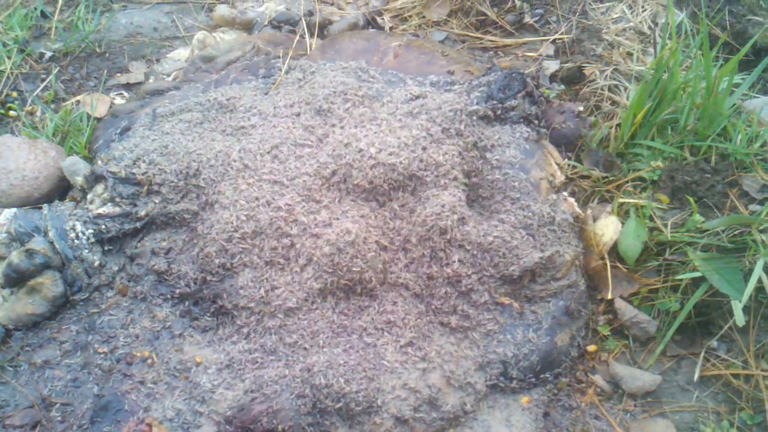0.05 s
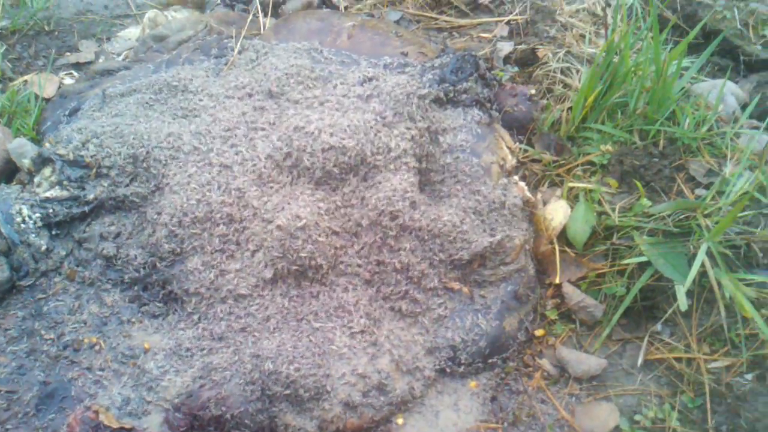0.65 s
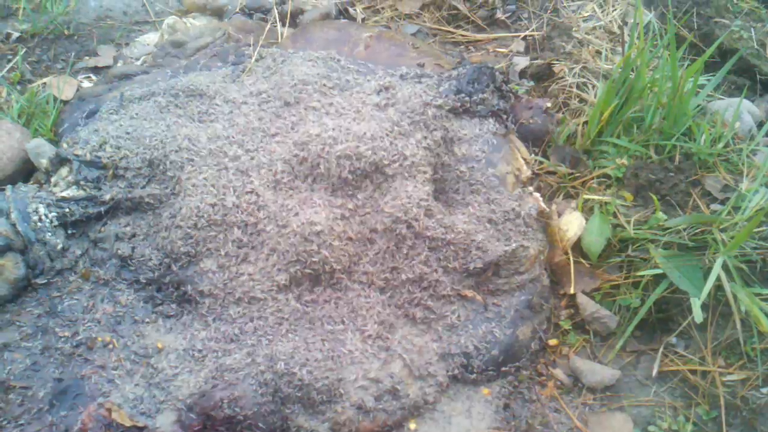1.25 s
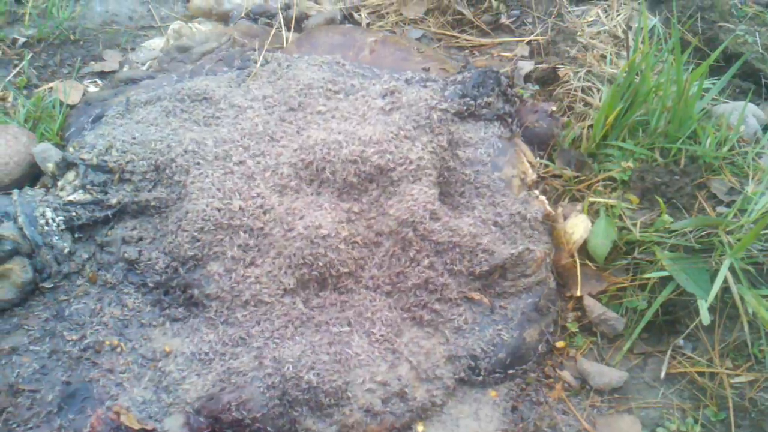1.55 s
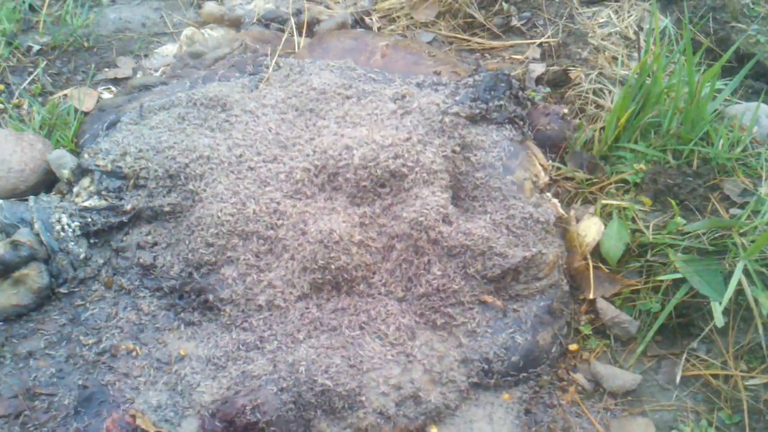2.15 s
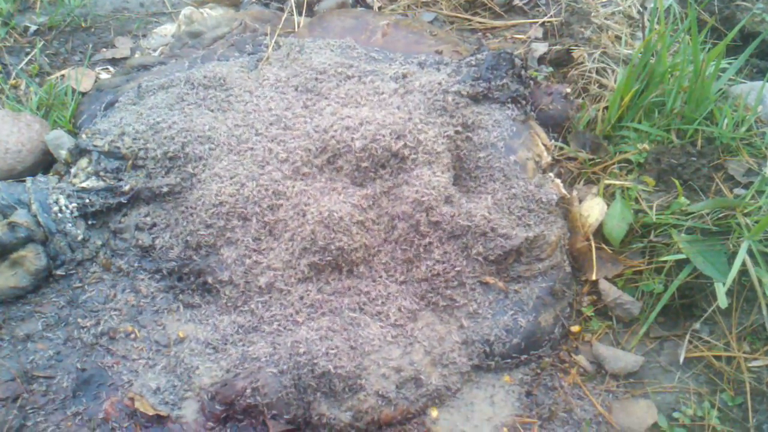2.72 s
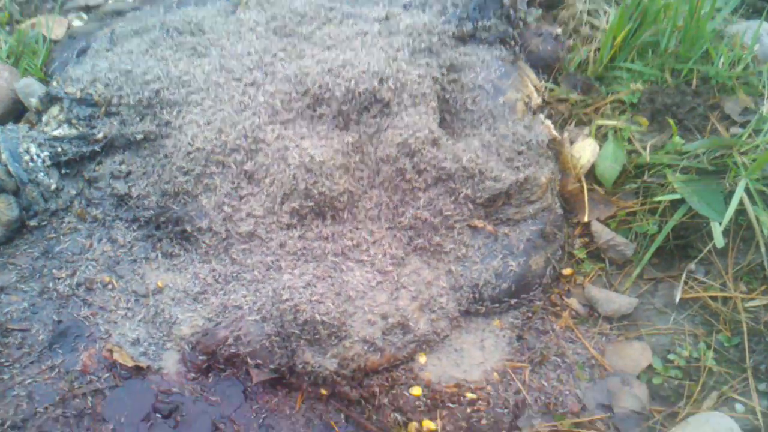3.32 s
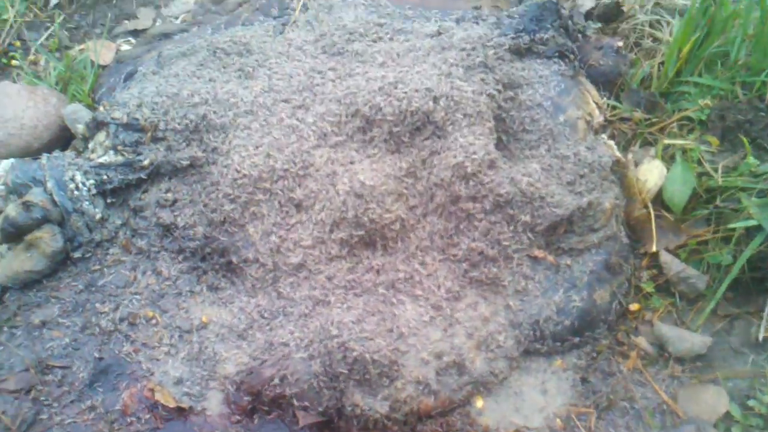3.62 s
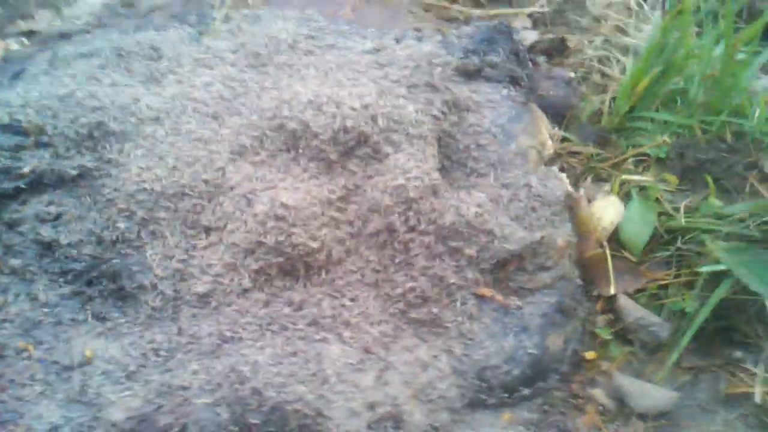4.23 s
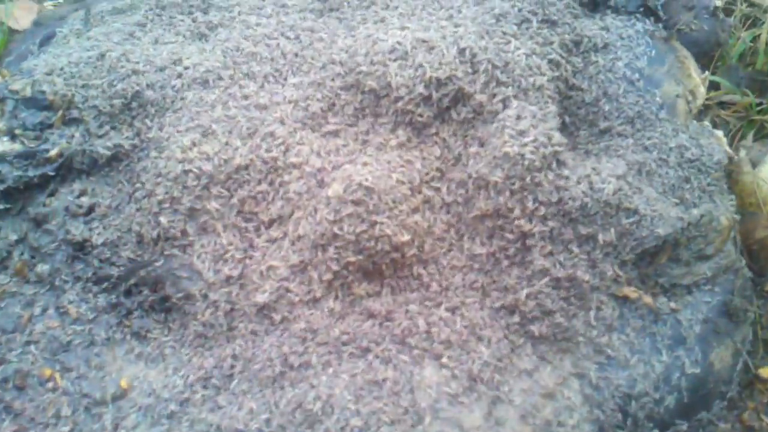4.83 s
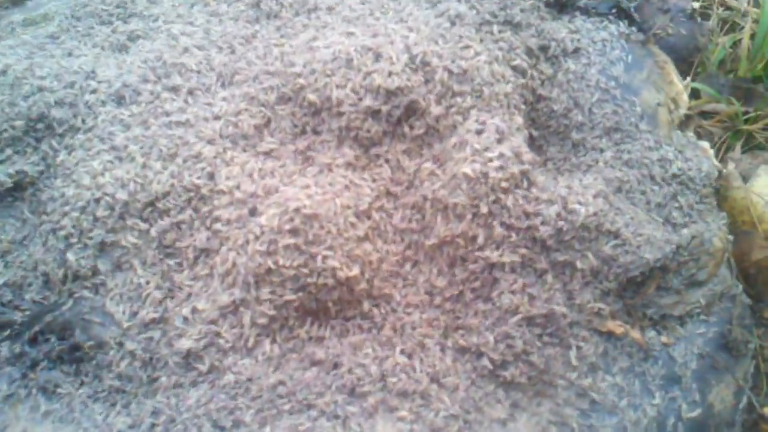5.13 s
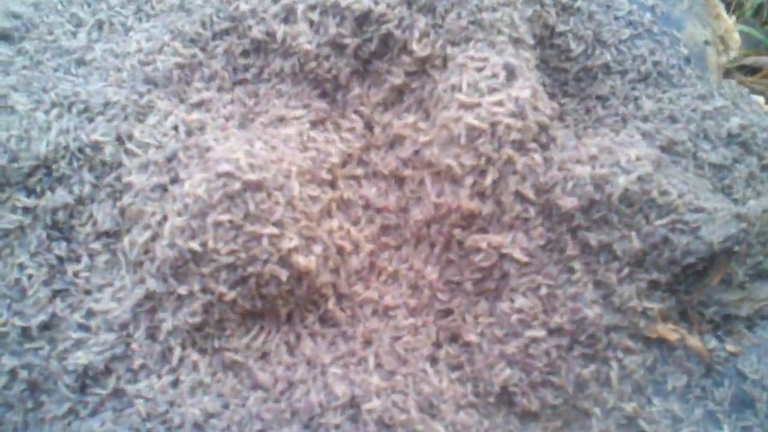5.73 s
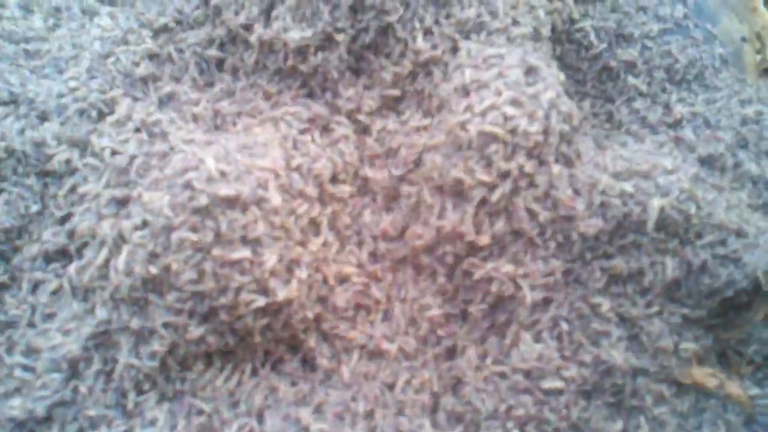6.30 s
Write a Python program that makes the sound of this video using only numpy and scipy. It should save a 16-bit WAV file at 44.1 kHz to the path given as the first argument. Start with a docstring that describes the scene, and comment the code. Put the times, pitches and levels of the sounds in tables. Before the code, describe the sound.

A handheld phone outdoors picks up the constant rumble and rattle of an idling engine at a distance, with hums and a thin whine. Tiny wet pops from a mass of maggots on the ground blend into a faint fizz. In the second half the microphone gets closer to them, bringing out a grainy crackle and several sharp little ticks as the engine's rattle becomes a bit more present.

```python
"""Maggots near an idling engine

Outdoors, a phone is held over a heap of maggots, whose tiny wet pops merge into a fizz. Some way off
an engine idles: its exhaust rumbles and its cylinders knock, in a pattern that repeats six times a
second, with hiss, hums and a whine. From about 3 s the phone is lowered: sound bouncing off the ground
fills in the middle pitches, a grainy crackle comes through and a few ticks stand out."""
import sys
import numpy as np
from scipy import signal
from scipy.fft import rfft, irfft
from scipy.io import wavfile

SR = 44100
rng = np.random.default_rng(int(sys.argv[2]) if len(sys.argv) > 2 else 0)


def put_to_file(sound):
    """Save the sound as 16-bit audio at rate SR, in the file named by the first command-line argument."""
    columns = np.atleast_2d(sound).T  # one column per channel
    safe = np.clip(columns, -1, 1)
    whole_steps = np.round(safe * 32767)
    wavfile.write(sys.argv[1], SR, whole_steps.astype(np.int16))


N = 284886
TIME, FREQS = np.arange(N) / SR, np.fft.rfftfreq(N, 1 / SR)
FIRING_HZ, TOP_HZ = 48.02, 13950  # engine firings per second; highest pitch the phone picks up

# How strong the rumble is from low to high: pitch_hz, gain_db
RUMBLE_SHAPE = [(20, -29), (55, -31.5), (80, -16.5), (115, -14), (155, -2.5), (220, -3.5), (310, -2),
                (420, -3), (590, -7), (700, -15.5), (1000, -21), (2000, -31), (5000, -38.5)]
# Slow rises and dips of the rumble: time_s, gain_db
RUMBLE_SWELLS = [(0, 0), (.65, 0.5), (.82, 0.5), (1.0, -0.5), (1.3, 1.5), (1.47, -2), (1.6, 0.5),
                 (1.92, 0.9), (2.07, -0.5), (2.6, -0.4), (2.9, -0.3), (3.15, 0), (3.35, -1.7), (3.56, 0.5),
                 (3.75, -0.1), (4.2, -1), (4.5, 0.4), (5.05, -0.5), (6.0, 0.5), (6.46, 0.7)]
# The noisy rumble's loudest band, which wanders by chance: time_s, pitch_hz, level_db
RUMBLE_PEAK_PATH = [(0, 346.3, -44.5), (.7, 343.7, -49), (.97, 355, -39), (1.2, 290, -44), (1.42, 335, -44),
                    (1.6, 350.4, -40), (1.95, 275, -39), (2.1, 320, -55), (2.35, 349.3, -40),
                    (3.152, 310, -42.5), (3.349, 363, -41.5), (3.571, 362, -34.5), (3.75, 340.8, -43),
                    (4.3, 346.4, -44), (4.54, 360, -38), (4.931, 338.4, -52), (5.3, 366.3, -41),
                    (5.5, 278.8, -40.5), (6.0, 274.4, -41), (6.46, 280, -41.5)]
# How hard each cylinder knocks, in firing order: dull_db, bright_db
CYLINDER_KNOCKS = [(-3.5, -5), (-7, -2.5), (-4.5, -4), (-5, 2), (-1.5, -2.5), (-0.5, -3.5), (-2, -5),
                   (-3, -3.5)]
# How strong the rattle is from low to high: pitch_hz, gain_db
RATTLE_SHAPE = [(300, -15), (700, 1), (1020, -1.5), (1600, 0), (2000, 1.5), (2480, -7.5), (2850, 0),
                (3200, -3), (4000, -9), (4800, -47), (9000, -40)]
# Where the engine's metal rings: pitch_hz, width_hz, boost_db
METAL_RINGS = [(1100, 26, 3), (1295, 40, 3.5), (1558, 58, 3.5), (1780, 47, 4), (1970, 41, 2),
               (2145, 41, 8.5), (2359, 245, 12)]
# How strong both engine hiss and maggot fizz are from low to high: pitch_hz, gain_db
FIZZ_SHAPE = [(500, -17), (2000, -15), (4400, 7), (4900, 1), (5800, 4.5), (6500, 3.5), (8000, 3.5),
              (9000, -1.5), (11000, -2), (13000, -9), (14000, -1.5)]
# Hums that follow the engine's speed: waves_per_cycle
ENGINE_HUM_MULTIPLES = [8, 16, 24, 32, 34, 44, 48, 88, 156, 166, 228, 256]
# How loud each of those hums is: level_db
ENGINE_HUM_LEVELS = [-70, -57, -56, -54.5, -52, -52.5, -61, -50.5, -61, -62, -65.5, -63]
# Looser hums of steady pitch, from the fan and belts and, higher up, from the engine: pitch_hz, level_db,
# width_hz
LOOSE_HUMS = [(133.86, -51.5, 0.61), (357.7, -46, 8.7), (404, -60, 1.7), (434.3, -50, 4.8),
              (534.7, -55.5, 2.6), (1135, -59.5, 2.8), (1427, -60, 2.6), (2140, -62, 4.7)]
# The whine's tones, from one step below its main pitch upwards: level_db, change_when_near_db
WHINE_TONES = [(-54, 3), (-51, -0.8), (-50.5, -3), (-54.5, -1.5)]
# What the bounce off the ground changes: pitch_hz, gain_when_near_db, extra_at_bottom_db
GROUND_BOUNCE = [(100, 2, -3.5), (206, 4, -2.5), (271, -1.5, 2.5), (310, -3, 2), (454, 1, -2.5),
                 (615, 5, -2), (690, 3, -2), (860, 0, 5), (1030, 5, 2.5), (1240, 8, -2.5), (1480, 8.5, -.5),
                 (1530, 4, -3), (1690, 2.5, 3.5), (1810, -4.5, 3), (1900, -0.5, 1.5), (2140, 1, -0.5),
                 (2350, 3, -6), (2730, 4.5, -2.5), (4000, 1.5, 1), (5000, -0.5, 1), (9000, 4.5, -3),
                 (12000, 3, 0.5)]
# Stray ticks: start_s, level_db, pitch_hz, fade_s (to fall by 60 dB), stereo_difference_db
STRAY_TICKS = [(4.465, -20, 1460, 0.0098, 0), (4.592, -23, 1400, .012, 0), (4.9589, -14, 1640, 0.013, 2),
               (4.961, -20.5, 960, 0.011, -3), (5.2264, -18, 2794, 0.0052, -3), (5.26, -29, 1400, .012, 0),
               (5.56, -27, 2900, .007, -1), (5.6488, -23, 1650, 0.011, 0), (5.7163, -22, 1700, 0.008, -2),
               (6.431, -27, 1566, 0.011, 0)]
# The phone's two microphones: pitch_hz, stereo_difference_db, lean_left (-1 to 1), crossfeed (0 to 1)
MICROPHONES = [(25, 8, -.2, 0.1), (68.7, 2, -0.32, 0.01), (136, -7.5, -0.0028, 0), (452, -10, 0.52, 0.02),
               (834, -10, 0.68, 0.43), (1210, -4.5, -0.13, 0.72), (1900, 3.5, -0.99, 0.94),
               (3850, -1.5, -0.7, 0.86), (4160, 0, -0.11, 0.38), (14000, 0, -0.016, 0.17)]


def gain_of(db):
    """Turns decibels into a number to multiply by."""
    return 10 ** (np.asarray(db) / 20)


def unit_level(x):
    """Scales a sound so that its average power is 1."""
    return x / np.sqrt(np.mean(np.abs(x) ** 2) + 1e-20)


def curve(points, column=1):
    """Joins a table's points into one value for every frequency."""
    table = np.array(points, float)
    return np.interp(np.log(FREQS + 1), np.log(table[:, 0] + 1), table[:, column])


def filtered(x, db):
    """Turns each frequency up or down by its own number of decibels."""
    return irfft(rfft(x) * gain_of(db), N)


def drift(rate_hz):
    """Two slow random wobbles, as complex numbers that hold both size and phase."""
    spectrum = rng.standard_normal((2, N)) + 1j * rng.standard_normal((2, N))
    keep_slow = np.exp(-(np.fft.fftfreq(N, 1 / SR) / rate_hz) ** 2)
    return unit_level(np.fft.ifft(spectrum * keep_slow))


def tone(turns, waver, waver_hz):
    """A pure tone plus a drifting copy that makes it waver; turns counts the waves gone by."""
    start_phase = np.exp(2j * np.pi * rng.random((2, 1)))
    wobble = start_phase + waver * drift(waver_hz)
    return unit_level((wobble * np.exp(2j * np.pi * turns)).real)


def cycle_noise(cycles, repeat_share, size=SR // 6):
    """Noise that is partly new and partly the same in every engine cycle."""
    patterns = rng.standard_normal((2, size))
    repeating = np.array([np.interp(cycles % 1, np.arange(size) / size, row) for row in patterns])
    return np.sqrt(repeat_share) * repeating + np.sqrt(1 - repeat_share) * rng.standard_normal((2, N))


def rumble(cycles, level_db=-34):
    """Noise from the exhaust and engine block, dulled by distance; its loudest band wanders."""
    times, hz, db = np.transpose(RUMBLE_PEAK_PATH)
    turns = np.cumsum(np.interp(TIME, times, hz)) / SR
    peak_band = gain_of(np.interp(TIME, times, db)) * tone(turns, waver=1.53, waver_hz=22)
    swell = gain_of(np.interp(TIME, *np.transpose(RUMBLE_SWELLS)))
    noise = filtered(cycle_noise(cycles, repeat_share=0.28), curve(RUMBLE_SHAPE))
    return peak_band + swell * gain_of(level_db) * unit_level(noise)


def knock_loudness(cycles, cylinder_db, ring_s=0.0071, echo_db=-5, valve_lead=0.32, valve_db=-0.5):
    """Each cylinder gives a valve tap, then a knock; both die quickly and echoes fill the gaps."""
    firings = len(CYLINDER_KNOCKS) * cycles
    power = gain_of(echo_db) ** 2 / 2
    for count, db in ((firings, 0), (firings + valve_lead, valve_db)):
        strength = gain_of(db + cylinder_db[count.astype(int) % len(CYLINDER_KNOCKS)])
        age = (count % 1) / FIRING_HZ
        power = power + strength ** 2 * np.exp(-age / ring_s)
    return np.sqrt(power)


def rattle(cycles, dull_lead_cycles=0.02, split_hz=2350, level_db=-39):
    """Each knock rings the engine's metal with a dull burst and, just after it, a bright one."""
    dull_db, bright_db = np.transpose(CYLINDER_KNOCKS)
    dull = cycle_noise(cycles, repeat_share=0.35) * knock_loudness(cycles + dull_lead_cycles, dull_db)
    bright = cycle_noise(cycles, repeat_share=0.35) * knock_loudness(cycles, bright_db)
    above_split = (FREQS / split_hz) ** 16 + 1e-12
    lows = filtered(unit_level(dull), -10 * np.log10(1 + above_split))
    highs = filtered(unit_level(bright), -10 * np.log10(1 + 1 / above_split))
    metal_db = sum(db / (1 + (2 * (FREQS - hz) / width) ** 2) for hz, width, db in METAL_RINGS)
    return gain_of(level_db) * unit_level(filtered(lows + highs, curve(RATTLE_SHAPE) + metal_db))


def hiss(cycles, level_db=-55.5, throb_db=2.5, loudest_at=0.69):
    """The engine's airy hiss swells once in every cycle."""
    throb = gain_of(throb_db * np.cos(2 * np.pi * (cycles - loudest_at)))
    noise = filtered(cycle_noise(cycles, repeat_share=0.24), curve(FIZZ_SHAPE))
    return gain_of(level_db) * throb * unit_level(noise)


def hums(cycles):
    """Engine hums that waver on their way through the air, and looser hums of steady pitch from the fan, the
    belts and the engine."""
    engine = sum(gain_of(db) * tone(multiple * cycles, waver=0.45, waver_hz=0.54)
                 for multiple, db in zip(ENGINE_HUM_MULTIPLES, ENGINE_HUM_LEVELS))
    loose = sum(gain_of(db) * tone(hz * TIME, waver=0.37, waver_hz=2 * width)
              for hz, db, width in LOOSE_HUMS)
    return engine + loose


def whine(cycles, near, pitch_hz=773.2, sag_hz=7, sag_at_s=3.93, sag_half_s=0.17):
    """A whine, probably a belt, sags once; the firings chop it into tones one firing rate apart."""
    sag = sag_hz * np.exp(-((TIME - sag_at_s) / sag_half_s) ** 2)
    turns = np.cumsum(pitch_hz - sag) / SR
    firings = len(CYLINDER_KNOCKS) * cycles
    return sum(gain_of(db + near_db * near) * tone(turns + step * firings, waver=0.2, waver_hz=2.5)
               for step, (db, near_db) in enumerate(WHINE_TONES, start=-1))


def maggot_fizz(near, pops_per_s=5000, level_db=-50.5, near_db=2.5, flurry_db=3.0, bands=6):
    """Thousands of tiny wet pops merge into a fizz that grows as the phone comes closer."""
    sizes = gain_of(-0.5 * np.minimum(rng.exponential(1, (2, N)), 4))
    pops = sizes * rng.choice([-1, 1], (2, N)) * (rng.random((2, N)) < pops_per_s / SR)
    wash = 0.81 * rng.standard_normal((2, N))
    spectrum = rfft(unit_level(pops) + wash) * gain_of(curve(FIZZ_SHAPE))
    band = np.minimum(FREQS / TOP_HZ * bands, bands - 1).astype(int)
    # coarse and fine pops each come in their own flurries
    fizz = sum(gain_of(flurry_db * drift(rate_hz=28).real) * irfft(spectrum * (band == k), N)
               for k in range(bands))
    return gain_of(level_db + near_db * near) * unit_level(fizz)


def nearness(lowered, reach):
    """Rises smoothly from 0 towards 1 as the phone passes reach, a share of the way down."""
    return 1 - np.exp(-(lowered / reach) ** 3)


def ground_bounce(direct, lowered, near, split_hz=640):
    """Low down, the ground's echo arrives in step with the direct sound and lifts the middle pitches."""
    lift = filtered(direct, curve(GROUND_BOUNCE)) - direct
    low_lift = filtered(lift, -20 * np.log10(1 + (FREQS / split_hz) ** 12))
    # the higher part fills in first, the lower part further down
    lifted = direct + near * (lift - low_lift) + nearness(lowered, reach=0.44) * low_lift
    bottom_change = filtered(lifted, curve(GROUND_BOUNCE, column=2)) - lifted
    return lifted + nearness(lowered, reach=0.83) * bottom_change


def near_crackle(near, grains_per_s=110, low_hz=1250, high_hz=1700, fade_s=0.0098, level_db=-48):
    """A grainy, ringing, mid-pitched crackle comes through as the phone nears the ground."""
    age, out = np.arange(SR // 30) / SR, np.zeros((2, N))
    pitches = np.linspace(low_hz, high_hz, 6)
    for hz in pitches:
        sizes = gain_of(2 * np.minimum(rng.exponential(1, N), 3))
        grains = sizes * (rng.random(N) < grains_per_s / len(pitches) / SR)
        stereo_grains = np.array([grains, grains * rng.uniform(-1.2, 1, N)])
        ring = gain_of(-60 * age / fade_s) * np.sin(2 * np.pi * hz * age)
        out += signal.oaconvolve(stereo_grains, ring[None])[:, :N]
    return gain_of(level_db) * near * unit_level(out)


def ticks(droop=0.15, droop_s=0.0002):
    """Short snaps that drop in pitch as they die and reach the two microphones unequally."""
    out = np.zeros((2, N))
    for start_s, db, hz, fade_s, difference_db in STRAY_TICKS:
        age = np.maximum(TIME - start_s, 0)
        turns = hz * (age + droop * droop_s * (1 - np.exp(-age / droop_s)))
        snap = gain_of(db - 60 * age / fade_s) * np.sin(2 * np.pi * turns)
        out += [snap, -gain_of(difference_db) * snap]
    return out


def scene(lower_from_s=3.09, lower_to_s=6):
    """Mixes everything into two rows: the sum and the difference of the phone's two microphones."""
    firings = 0.43 + FIRING_HZ * TIME  # starts partway between two firings
    cycles = firings / len(CYLINDER_KNOCKS)
    lowered = np.clip((TIME - lower_from_s) / (lower_to_s - lower_from_s), 0, 1)
    near = nearness(lowered, reach=0.34)
    engine = rumble(cycles) + rattle(cycles) + hiss(cycles) + hums(cycles) + whine(cycles, near)
    return ground_bounce(engine, lowered, near) + maggot_fizz(near) + near_crackle(near) + ticks()


def record(dry, delay_s=0.00038):
    """The phone widens the stereo by taking a late copy of each side from the other, and cuts the top."""
    total, difference = rfft(dry)
    spread = gain_of(curve(MICROPHONES))
    lean = np.clip(curve(MICROPHONES, column=2), -1, 1)
    crossfeed = np.clip(curve(MICROPHONES, column=3), 0, 1) * np.exp(-2j * np.pi * FREQS * delay_s)
    mid_gain, side_gain = 1 - crossfeed, spread * (1 + crossfeed)
    mid = mid_gain * total
    side = side_gain * (lean * total + np.sqrt(1 - lean ** 2) * difference)
    even_out = 1 / np.hypot(abs(mid_gain), abs(side_gain))  # keeps low and high in balance
    top_cut = np.clip((TOP_HZ - FREQS) / 80 + 0.5, 0, 1)
    return irfft(np.array([mid + side, mid - side]) * even_out * top_cut, N)


dry = scene()
out = record(dry)
put_to_file(out)
```